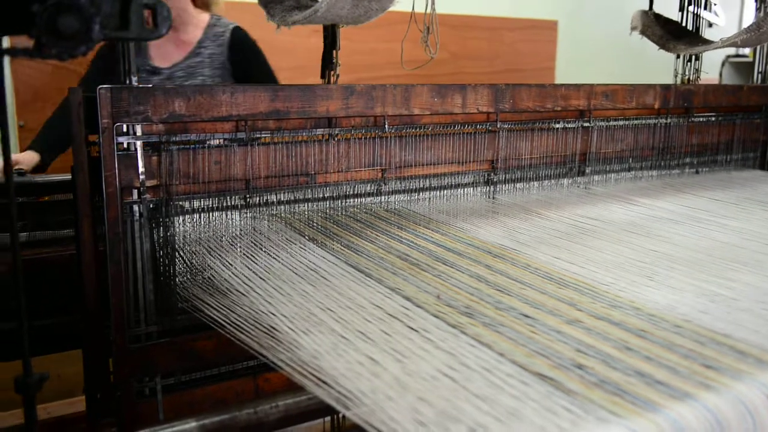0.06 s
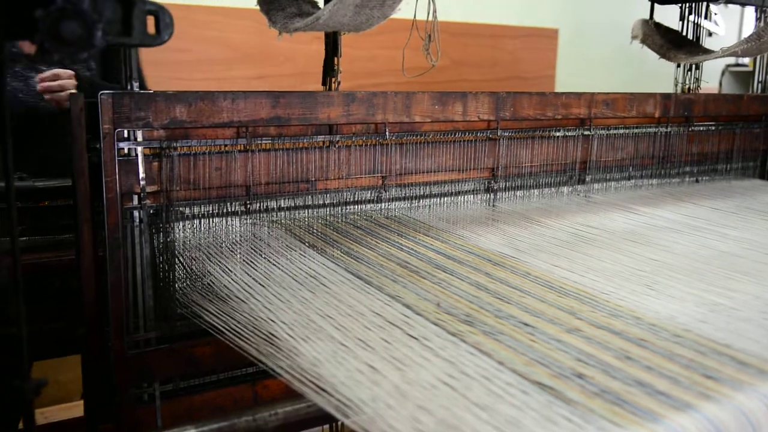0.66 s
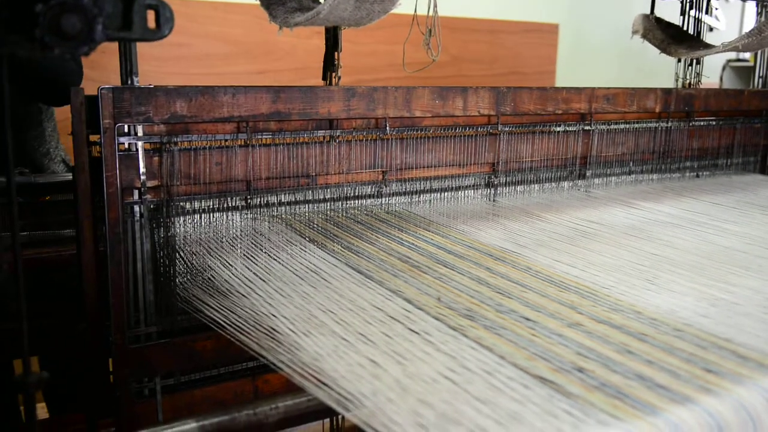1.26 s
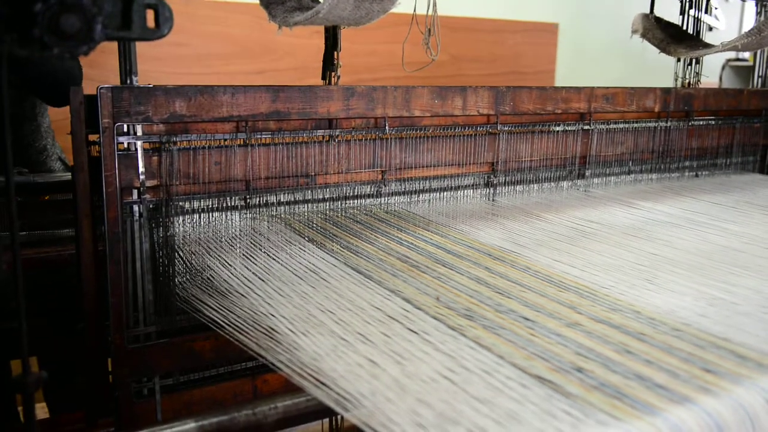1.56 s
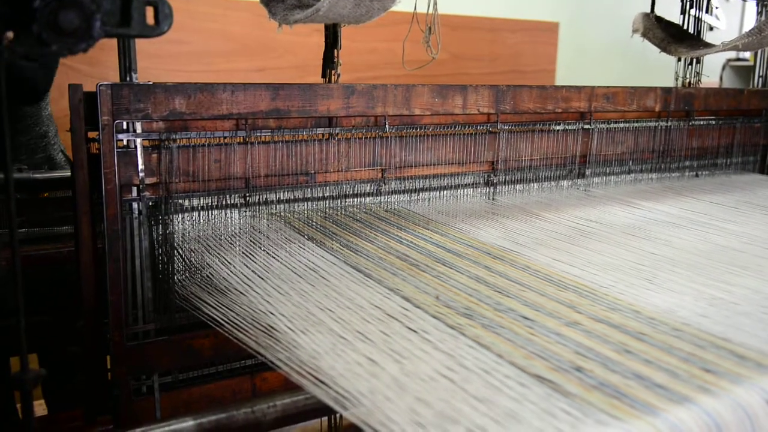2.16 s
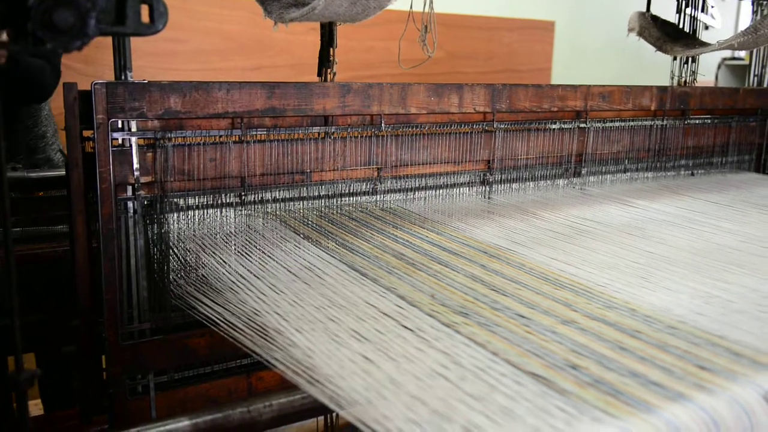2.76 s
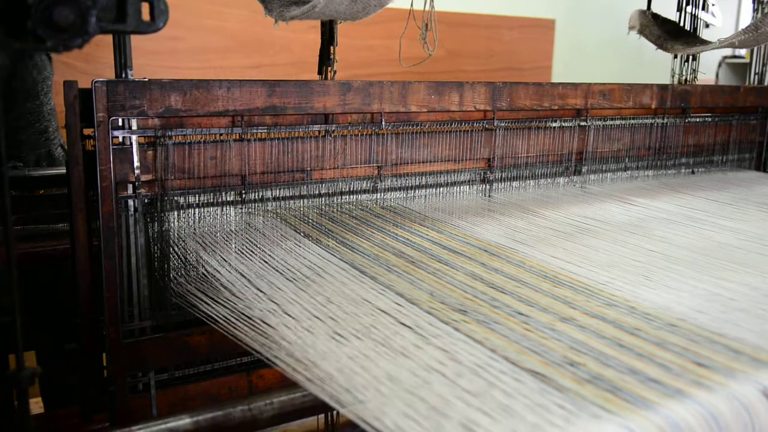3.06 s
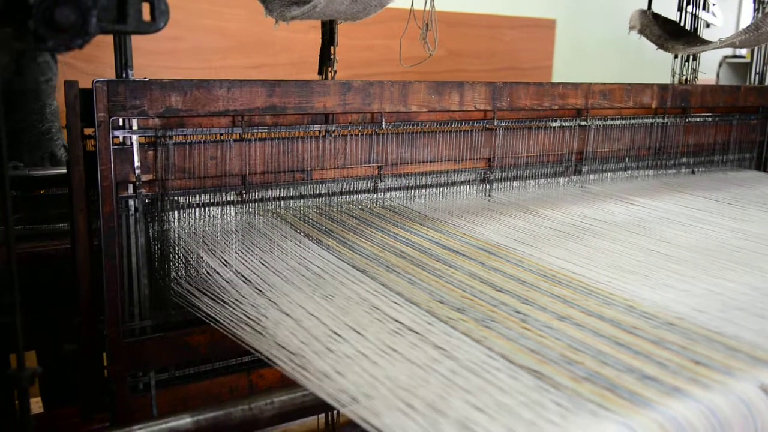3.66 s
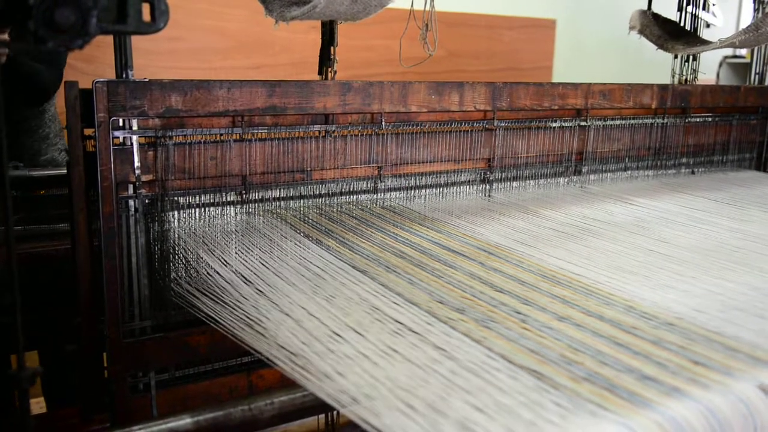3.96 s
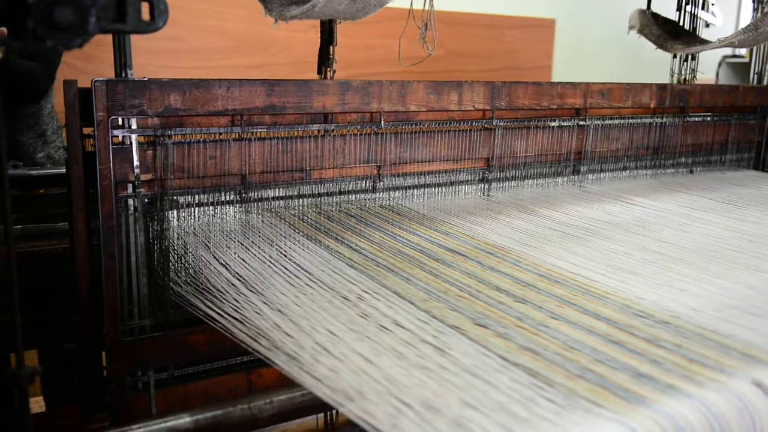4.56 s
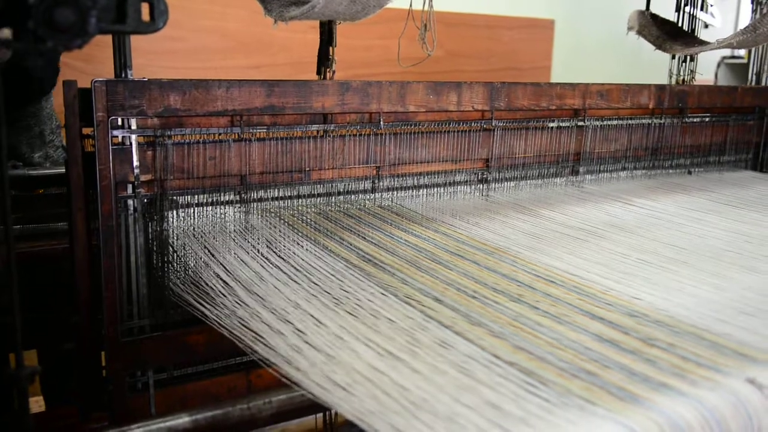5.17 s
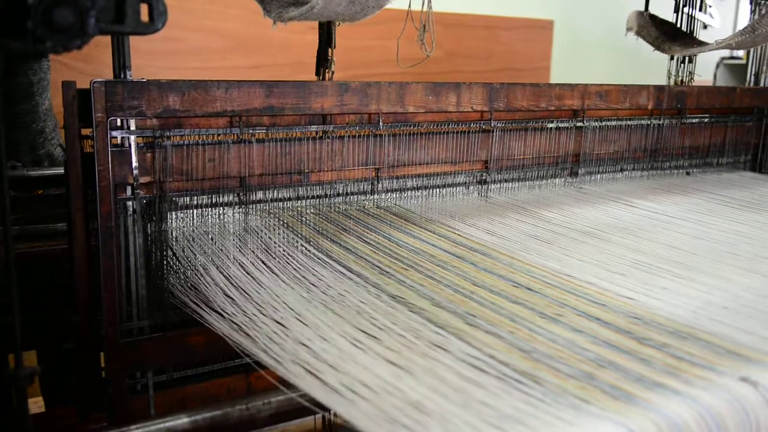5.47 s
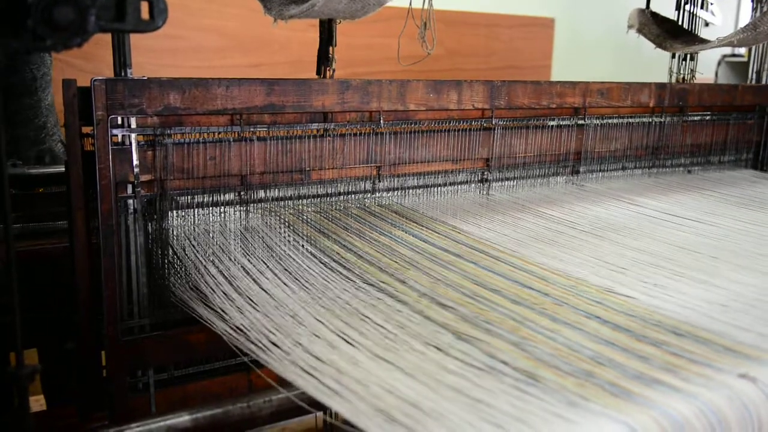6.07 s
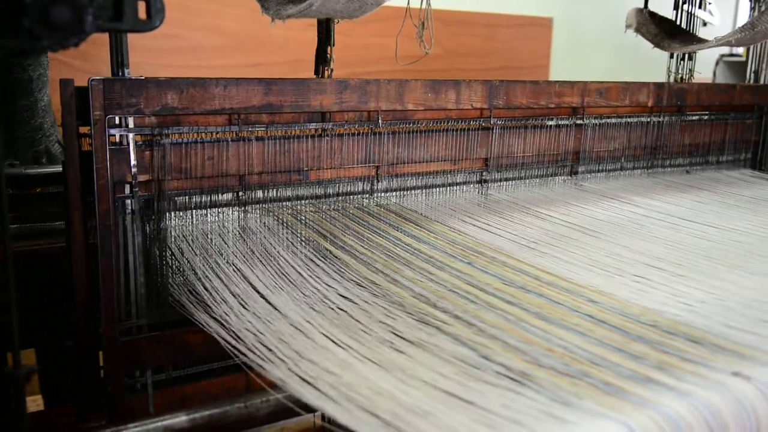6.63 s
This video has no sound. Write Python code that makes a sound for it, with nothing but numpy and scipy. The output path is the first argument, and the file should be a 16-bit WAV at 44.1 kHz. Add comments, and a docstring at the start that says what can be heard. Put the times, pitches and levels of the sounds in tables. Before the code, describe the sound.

Light bumps and clicks over a high motor hum, then a wooden loom clatters through eight even strokes in a mill hall.

```python
"""A wooden loom works eight strokes near the microphone in a mill hall, after a few handling knocks
and light pings. Each stroke starts with a knock, takes up its slack, swells and eases off, shaking
a clatter out of the frame, with iron clacks and thin wire ticks. In the first three a pawl drops
over a ratchet and rings. The hall reverberates around the loom; further off a motor hums and whines."""
import sys
import numpy as np
from scipy import signal
from scipy.fft import rfft, irfft
from scipy.io import wavfile
from scipy.ndimage import uniform_filter1d

SR = 44100
rng = np.random.default_rng(int(sys.argv[2]) if len(sys.argv) > 2 else 0)


def output_pcm(signal):
    """Save a mono or channel-first signal as 16-bit PCM at the path in sys.argv[1].

    Samples are clipped to [-1, 1] before scaling.
    """
    pcm = np.clip(np.atleast_2d(signal).T, -1, 1) * 32767
    wavfile.write(sys.argv[1], SR, np.round(pcm).astype(np.int16))


N = 304290
T = np.arange(N) / SR

# Table levels are relative: each source adds its own gain.
# a nudge, then eight strokes: start/s, slack/s, time to crest/s, length/s, slack force/dB,
# crest force/dB, weight of the thumps/dB, hardness of the contacts/dB
LOOM_STROKES = [ (0.11, 0.012, 0.011, 0.092, -29, -31, -7.5, 0.5),
                (2.253, 0.052, 0.16, 0.3, -17.5, -16.5, -8.5, -5),
                (2.912, 0.047, 0.089, 0.21, -18, -14.5, -13.5, -11),
                (3.478, 0.084, 0.17, 0.22, -16, -12.5, -8, 1),
                (4.051, 0.06, 0.07, 0.18, -14.5, -14, -6.5, -7),
                (4.612, 0.041, 0.15, 0.21, -21.5, -13.5, -7, -6.5),
                (5.151, 0.06, 0.16, 0.25, -24, -15, -6, -3),
                (5.749, 0.075, 0.13, 0.22, -24, -15.5, -6.5, -1.5),
                (6.321, 0.069, 0.16, 0.21, -20.5, -15.5, -8.5, -2), ]
TAKE_UP_S = 0.022  # the end of the slack, in which the drive pulls tight
# pawl dropping on the ratchet: t/s, crack level/dB, ring level/dB
PAWL_DROPS = [(2.3153, -3, -18), (2.396, -2, -22), (2.4721, -6, -15), (2.5456, -9, -26),
              (2.9083, -6.5, -17.5), (2.9633, -3, -12), (3.032, -3, -12), (3.0954, -8.5, -12),
              (3.1517, -7.5, -16.5), (3.4466, -30, -42), (3.485, -7, -16), (3.5468, -2, -15)]
# hardest clacks of iron: t/s, level/dB
IRON_CLACKS = [(0.164, -25), (2.228, -24), (2.281, -15), (2.3282, -4), (2.9933, -1.5), (3.021, 1.5),
               (3.0497, 1.5), (3.559, -1), (3.6143, 6), (3.6767, -0.5), (4.1402, -3), (4.148, -5.5),
               (4.799, -3), (5.3167, -1), (5.8039, -6.5), (6.47, -3)]
# hardest knocks of wood: t/s, level/dB, ring f/Hz
WOOD_KNOCKS = [(0.114, -16.5, 2600), (3.585, -1.5, 2600), (4.123, -0.5, 2280), (4.709, 1.5, 1840),
               (5.288, 0, 2330), (5.357, -6, 3520), (5.772, -24, 2000), (6.437, -2, 3360)]
# sharpest ticks of the heddle wires: t/s, level/dB
WIRE_TICKS = [(2.3629, -13), (2.38, -5), (4.1001, -4.5), (4.659, -15), (5.2237, -13), (5.243, -18),
              (5.9284, -12)]
# light touches on metal: t/s, level/dB, f/Hz
METAL_PINGS = [(0.088, -25, 8250), (0.9971, -22.5, 8250), (1.0091, -27, 7490), (1.1233, -23.5, 7150),
               (1.6412, -23.5, 7040), (1.8894, -34, 7510), (2.16, -26.5, 6980), (6.8446, -21, 6770)]
# dull bumps on the frame: t/s, level/dB, f/Hz
FRAME_BUMPS = [(0.052, -17, 207), (0.124, -21, 201), (0.174, -19, 215), (0.592, -20.5, 235),
               (0.614, -10, 177), (0.659, -17.5, 260), (0.707, -24, 229)]

# modes of the wooden frame: f/Hz, level/dB, t60/s
FRAME_MODES = [(118, -8, 0.33), (248.4, -4.5, 0.14), (420.2, 6.5, 0.093), (606, -5.5, 0.15),
               (851, 5, 0.056), (1026, -3.5, 0.18), (1180, 5, 0.025), (1341, 4.5, 0.051),
               (1545, 1.5, 0.065), (1920, -15, 0.071), (2085, 3, 0.073), (2280, 3.5, 0.1), (2620, 2, 0.065)]
# modes of the pawl: f/Hz, level/dB, t60/s
PAWL_RING_MODES = [(2663, -12, 0.067), (4830, -8, 0.04), (5350, -12, 0.14), (5480, -5.5, 0.073),
                   (6700, -25, .12), (8330, -13, 0.069), (9360, -19.5, 0.2)]
# spectrum of heavy parts thumping: f/Hz, level/dB
THUMP_COLOUR = [(30, -40), (60, -11), (85, -6), (115, 2), (160, -6.5), (250, -1.5), (400, -8.5), (800, -46)]
# spectrum of wooden bars colliding: f/Hz, level/dB
BAR_COLOUR = [(120, -14), (260, -10.5), (380, 1.5), (560, -6), (1000, 4), (1500, -1), (2400, -4),
              (3300, -8.5), (5000, -15.5), (12000, -72)]
# spectrum of rattling fittings: f/Hz, level/dB
FITTING_COLOUR = [(1200, -14), (2800, -3), (3900, -1.5), (5100, 1.5), (6300, -5), (8000, -5), (10000, -21),
                  (12000, -24), (13500, -30), (16000, -39)]
# spectrum of the pawl striking a tooth: f/Hz, level/dB
TOOTH_COLOUR = [(200, -17), (1000, 1), (2600, 5.5), (3700, 4.5), (5200, 5), (7000, 0.5), (10000, -3),
                (13000, -12.5), (16000, -16)]
# spectrum of a wooden knock: f/Hz, level/dB
KNOCK_COLOUR = [(100, -8), (300, -2.5), (600, -2.5), (1300, 10.5), (2400, -11), (3700, 1.5), (5500, -33),
                (12000, -41)]
# spectrum of an iron clack: f/Hz, level/dB
CLACK_COLOUR = [(200, -33), (1000, -3), (2600, 4.5), (3700, -5.5), (5200, 3), (7000, -4.5), (9000, -7),
                (12000, -13), (16000, -35)]

# spectrum of the hall's reverberation: f/Hz, level/dB
HALL_COLOUR = [(50, -7), (300, 3.5), (1200, -3.5), (4000, -3), (8000, -2), (12000, -6), (16000, -4.5)]
# decay of the hall by band: f/Hz, t60/s
HALL_DECAY = [(100, 0.95), (260, 0.75), (700, 0.84), (1840, 0.74), (4850, 0.67), (12000, 0.47)]
# hum of the far motor: f/Hz, level/dB
HUM_LINES = [(59.2, -51), (441.4, -57.5), (619.1, -55.5), (823.6, -60.5), (942.1, -52), (1087, -55.5),
             (1200, -52), (1443, -48.5), (1599, -56.5), (1733, -64), (2202, -61.5), (2439, -62)]
# whine of the far motor: f/Hz, width/Hz, level/dB
WHINE_BANDS = [(424, 31, -57), (953, 106, -45.5), (1225, 51, -49), (1449, 170, -44.5)]
# spectrum of moving air: f/Hz, level/dB
AIR_COLOUR = [(20, 0), (45, 6), (90, 1.5), (200, 6), (330, -0.5), (700, 4), (1150, -2), (1800, 0.5),
              (3500, -3), (5000, -8.5), (8000, -10.5), (12000, -20), (16000, -26)]


def clatter(wood_db=-3, frame_db=-9, thump_db=-6, rattle_db=-6):
    """A stroke throws the loom's loose wood about: bars collide, the frame rings, fittings rattle."""
    blows = contacts(per_s=380, scatter_db=4) * stroke_gain()
    heavy = contacts(per_s=150, scatter_db=5.5) * stroke_gain(thump=True)
    light = contacts(per_s=520, scatter_db=2.5) * stroke_gain(hard=True)
    bars = undb(wood_db) * loose_parts(blows, BAR_COLOUR, t60=0.063, rise_s=0.00012, count=10)
    frame = undb(frame_db) * convolve(blows, unit(ring(FRAME_MODES)))
    thumps = undb(thump_db) * loose_parts(heavy, THUMP_COLOUR, t60=0.068, rise_s=0.0034, count=10)
    fittings = undb(rattle_db) * loose_parts(light, FITTING_COLOUR, t60=0.018, rise_s=0.00023, count=6)
    return bars + frame + thumps + fittings


def stroke_gain(thump=False, hard=False, edge_s=0.0062):
    """Force of the strokes as a gain, or its share in thumps or hard contacts; zero between strokes."""
    gain = np.zeros(N)
    for start, slack, crest, length, slack_db, crest_db, thump_db, hard_db in LOOM_STROKES:
        t = T - start
        # start, slack running out, take-up, crest, end
        stages = np.maximum.accumulate([0, slack - TAKE_UP_S, slack, crest, length])
        db = np.interp(t, stages, [slack_db - 3.5, slack_db, crest_db - 1.5, crest_db, crest_db - 7])
        if thump:  # the heavy parts gain weight after the crest
            db += thump_db + np.interp(t, stages[3:], [0, 5])
        if hard:  # contacts are softer in the slack
            db += hard_db + np.interp(t, stages[1:3], [-11, 0])
        gate = np.clip(np.minimum(t, length - t) / edge_s + 1, 0, 1)
        gain += gate * undb(db)
    return gain


def contacts(per_s, scatter_db):
    """Random collisions that share a steady power between them."""
    struck = rng.random(N) < per_s / SR
    hits = struck * undb(scatter_db * rng.standard_normal(N)) * rng.choice([-1, 1], N)
    power = uniform_filter1d(hits ** 2, size=1500)
    return hits / np.sqrt(np.abs(power) + 1e-9)


def loose_parts(hits, colour, t60, rise_s, count):
    """Each collision lands on one of several parts, each with its own short ring."""
    part = rng.integers(0, count, N)
    return sum(convolve(hits * (part == k), unit(burst(colour, t60, rise_s))) for k in range(count))


def knocks(level_db=-10, tone_db=-7, t60=0.053, ring_t60=0.036):
    """Wood strikes wood: a crack and the note of the struck bar."""
    out = np.zeros(N)
    for s, db, hz in WOOD_KNOCKS + stroke_knocks():
        add(out, s, undb(db + level_db) * burst(KNOCK_COLOUR, t60, rise_s=0.00053))
        add(out, s, ring([(hz, db + tone_db, ring_t60)], size=8192))
    return out


def stroke_knocks(bar_hz=1842, spread=0.168, start_db=3.5, take_up_db=7):
    """One bar knocks as a stroke starts, another at take-up: t/s, level/dB, f/Hz."""
    hits = []
    for start, slack, _, _, slack_db, crest_db, *_ in LOOM_STROKES:
        first_hz, second_hz = bar_hz * (1 + spread * rng.uniform(-0.95, 1, size=2))
        hits.append((start, slack_db + start_db, first_hz))
        hits.append((start + slack, crest_db + take_up_db, second_hz))
    return hits


def clacks(level_db=-5, t60=0.021):
    """Short hard cracks of iron on iron."""
    out = np.zeros(N)
    for s, db in IRON_CLACKS + stray_hits(over_db=10, count=3):
        add(out, s, undb(db + level_db) * burst(CLACK_COLOUR, t60, rise_s=0.0001))
    return out


def stray_hits(over_db, count, scatter_db=4):
    """Uneven hits from take-up to the end of each stroke, following its hard contacts: t/s, level/dB."""
    shake = stroke_gain(hard=True)
    hits = []
    for start, slack, _, length, *_ in LOOM_STROKES:
        times = start + slack + (length - slack) * (np.arange(count) + rng.random(count)) / count
        db = 20 * np.log10(np.interp(times, T, shake) + 1e-9)
        hits += zip(times, db + over_db + scatter_db * rng.uniform(-1.2, 1, count))
    return hits


def pawl(crack_db=-5, ring_db=5.5, clink_hz=5440, clink_t60=0.084, chatter_s=0.0026, t60=0.044):
    """The pawl chatters on a ratchet tooth for a moment, clinks roughly and rings."""
    out = np.zeros(N)
    contact = np.minimum(fade(t60) * np.exp(np.log(1000) * chatter_s / t60), 1)  # holds, then decays
    clink = [(clink_hz - 350, -45), (clink_hz - 90, -3), (clink_hz, 0),
             (clink_hz + 90, -3), (clink_hz + 350, -45)]
    for s, db, tone_db in PAWL_DROPS:
        add(out, s, undb(db + crack_db) * contact * noise(TOOTH_COLOUR, size=8192))
        add(out, s, undb(tone_db) * burst(clink, clink_t60))
        add(out, s, undb(tone_db + ring_db) * ring(PAWL_RING_MODES))
    return out


def ticks(level_db=-2, low_hz=7000, high_hz=11500, sweep_s=0.00174, buzz_db=-11, t60=0.042):
    """A taut heddle wire gives a very quick upward zip and a short buzz."""
    out = np.zeros(N)
    progress = np.clip(T[:8192] / sweep_s, 0, 1)
    hz = low_hz + (high_hz - low_hz) * progress
    chirp = np.sin(np.pi * progress) * np.sin(2 * np.pi * np.cumsum(hz) / SR)
    for s, db in WIRE_TICKS + stray_hits(over_db=1.5, count=4):
        buzz = burst([(4000, -23), (7500, 10), (10000, 1), (11500, -2), (13500, -16)], t60)
        add(out, s, undb(db + level_db) * (chirp + undb(buzz_db) * buzz))
    return out


def heddles(jingle_db=-20, eye_hz=11800, rustle_db=-54, settle_t60=14):
    """The wire eyes jingle under hard contacts; the threads rustle on while they settle."""
    eyes = [(7000, -30), (9700, -10), (eye_hz, 0), (1.09 * eye_hz, -18), (15000, -44)]
    touches = contacts(per_s=60, scatter_db=6) * stroke_gain(hard=True)
    jingle = loose_parts(touches, eyes, t60=0.024, rise_s=0.00058, count=3)
    settling = convolve(stroke_gain(), fade(settle_t60, size=65536))  # the tail stops after 1.5 s
    threads = noise([(3000, -22), (6000, -11), (8000, -1), (11000, -2), (16000, -16)])
    threads *= undb(2.7 * walk(40))
    return undb(jingle_db) * jingle + undb(rustle_db) * threads * settling / settling.max()


def bumps(note_db=-2, body_db=8, t60=0.12, note_t60=0.06, rise_s=0.007):
    """Soft heavy contacts reach only the low notes of the frame."""
    out = np.zeros(N)
    push = 1 - fade(np.log(1000) * rise_s)
    for s, db, hz in FRAME_BUMPS:
        body = [(40, -22), (hz / 2, -8), (hz, 0), (2 * hz, -8),
                (520, -8), (750, -17), (1500, -28), (5000, -42)]
        add(out, s, undb(db + body_db) * unit(burst(body, t60, rise_s)))
        add(out, s, push * ring([(hz, db + note_db, note_t60)], size=8192))
    return out


def pings(level_db=-7, t60=0.079, skirt_hz=520):
    """Lightly touched metal rings in a narrow cluster of high partials."""
    out = np.zeros(N)
    for s, db, hz in METAL_PINGS:
        cluster = [(3000, -32), (hz - skirt_hz, -19), (hz, 0), (hz + skirt_hz, -16),
                   (12000, -34), (14300, -26), (16000, -36)]
        add(out, s, undb(db + level_db) * burst(cluster, t60, rise_s=0.0053))
    return out


def catch(start_s=0.274, gap_s=0.0581, teeth=14, middle_db=-33.5, ends_db=-10, t60=0.023):
    """A small sprung catch clicks faintly and evenly over its teeth, loudest in mid-run."""
    out = np.zeros(N)
    spring = [(2000, -19), (3200, -9), (4200, -16), (5000, -9),
              (5500, -11), (6100, -3.5), (6800, -14), (14000, -31)]
    for tooth, off_middle in enumerate(np.abs(np.linspace(-1, 1, teeth))):
        add(out, start_s + tooth * gap_s, undb(middle_db + ends_db * off_middle) * burst(spring, t60))
    return out


def hall(x, tail_db=-6.5, early_db=-10, early_t60=0.057, build_s=0.016, size=49152):
    """Near surfaces throw the upper range back at once; the hall rings on, longest in the bass."""
    hz = np.fft.rfftfreq(size, 1 / SR)
    spectrum = rfft(noise(HALL_COLOUR, size))
    centres, t60s = np.transpose(HALL_DECAY)
    tail = np.zeros(size)
    for weights, t60 in zip(np.eye(len(t60s)), t60s):
        band = curve_at(np.c_[centres, weights], hz)
        tail += irfft(spectrum * band, size) * fade(t60, size)
    early = noise([(200, -4.5), (1500, 1.5), (5000, -1), (16000, -15.5)], size) * fade(early_t60, size)
    response = undb(tail_db) * unit(tail) + undb(early_db) * unit(early)
    return convolve(x, response * np.clip(T[:size] / build_s, 0, 1))


def motor(air_db=-41.5, waver_hz=1.18, flutter_db=3.5):
    """The motor, further from the microphone: wavering hum, whining bands and a rush of air."""
    out = undb(air_db) * noise(AIR_COLOUR)
    for hz, db in HUM_LINES:
        unsteady = min(hz / 500, 1)  # the lowest hum is nearly still
        phase = 2 * np.pi * np.cumsum(hz + waver_hz * unsteady * walk(12)) / SR
        out += undb(db + flutter_db * unsteady * walk(17)) * np.sqrt(2) * np.sin(phase)
    for hz, width, db in WHINE_BANDS:
        skirt = [(hz / 2, -70), (hz - width, -14), (hz - width / 2, -2), (hz, 0),
                 (hz + width / 2, -2), (hz + width, -16), (2 * hz, -70)]
        out += undb(db) * noise(skirt)
    return out


def burst(colour, t60, rise_s=0.00012):
    """A dense ring of many modes; soft contacts take longer to rise."""
    return noise(colour, size=8192) * fade(t60) * (1 - fade(np.log(1000) * rise_s))


def ring(modes, size=32768):
    """Decaying modes (f/Hz, level/dB, t60/s), each set going up or down by the place of the blow."""
    return sum(rng.choice([-1, 1]) * undb(db) * fade(t60, size) * np.sin(2 * np.pi * hz * T[:size])
               for hz, db, t60 in modes)


def noise(colour, size=N):
    """Noise of rms 1 with a given colour (f/Hz, level/dB)."""
    gains = undb(curve_at(colour, np.fft.rfftfreq(size, 1 / SR)))
    return unit(irfft(rfft(rng.standard_normal(size)) * gains, size)) * np.sqrt(size)


def curve_at(points, hz):
    """Interpolate (f/Hz, value) points on a log-frequency axis."""
    f, value = np.transpose(points)
    return np.interp(np.log(hz + 1e-9), np.log(f), value)


def fade(t60, size=8192):
    """Exponential decay, 60 dB in t60 seconds."""
    return np.exp(-np.log(1000) * T[:size] / t60)


def walk(per_s):
    """Random levels joined by straight lines, spread near 1."""
    return 1.2 * np.interp(T * per_s, np.arange(1024), rng.standard_normal(1024))


def undb(db):
    """Decibels to gain."""
    return 10 ** (np.asarray(db) / 20)


def unit(x):
    """Scale to an energy of one."""
    return x / np.sqrt(np.sum(x ** 2))


def convolve(x, response):
    """Sound x played through a response."""
    return signal.oaconvolve(x, response)[:N]


def add(out, s, sound):
    """Mix a sound in at s seconds."""
    i = max(int(s * SR), 0)
    out[i:i + len(sound)] += sound[:max(N - i, 0)]


def scene():
    """From one spot in the mill: the loom near by, the hall around it, the motor beyond."""
    loom = clatter() + heddles() + pawl() + clacks() + knocks() + ticks() + catch() + pings() + bumps()
    return (loom + hall(loom) + motor())[None]


def record(dry, low_cut_hz=52, top_hz=15900):
    """One microphone: it sheds the deepest bass, the hardest cracks overload it, and the top is cut."""
    thinned = signal.sosfilt(signal.butter(4, low_cut_hz, "highpass", fs=SR, output="sos"), dry)
    rounded = thinned / (1 + thinned ** 8) ** (1 / 8)
    return signal.sosfilt(signal.ellip(10, 0.1, 70, top_hz, fs=SR, output="sos"), rounded)


dry = scene()
out = record(dry)
output_pcm(out)
```